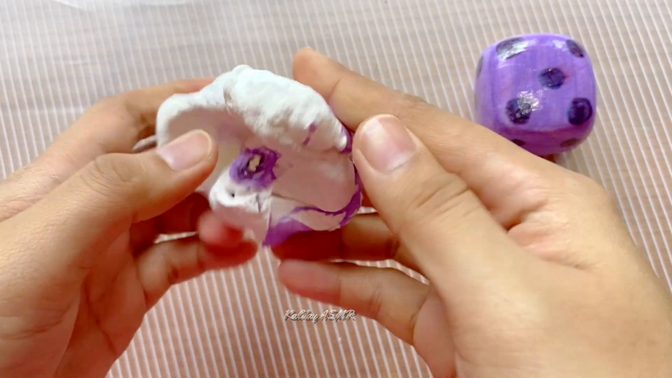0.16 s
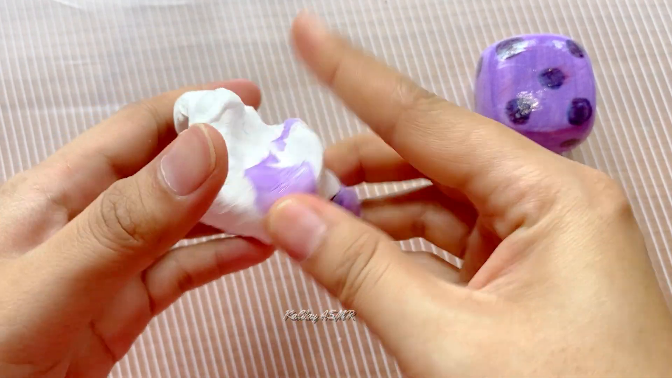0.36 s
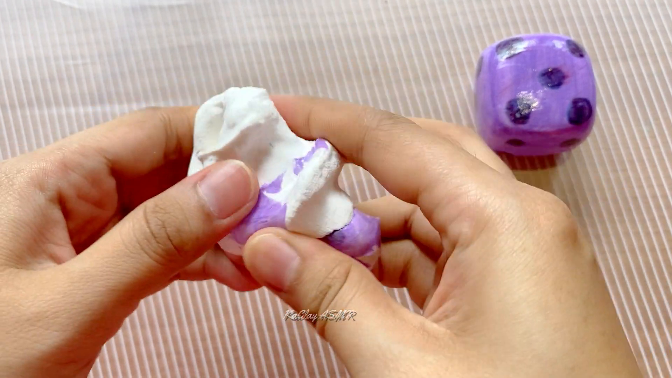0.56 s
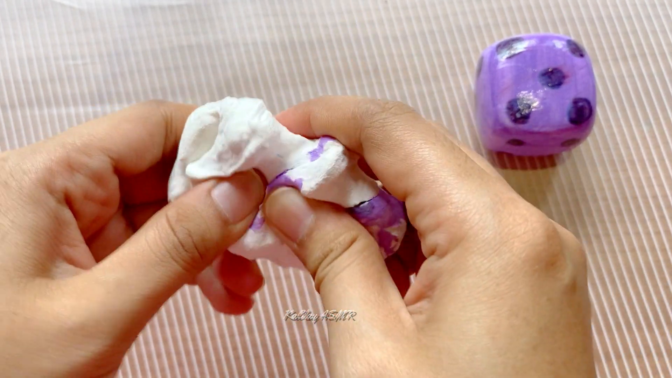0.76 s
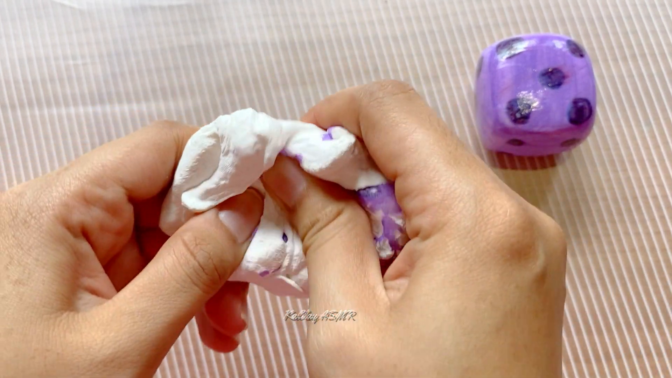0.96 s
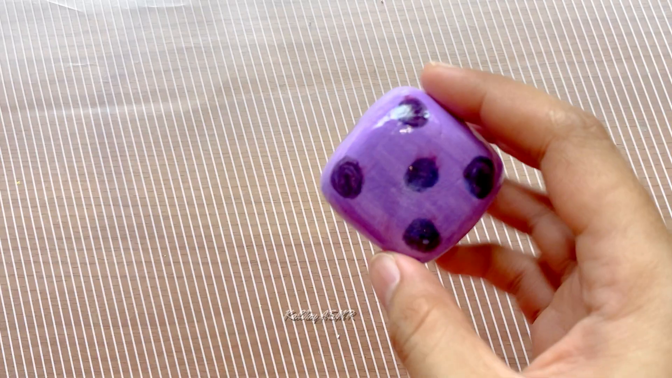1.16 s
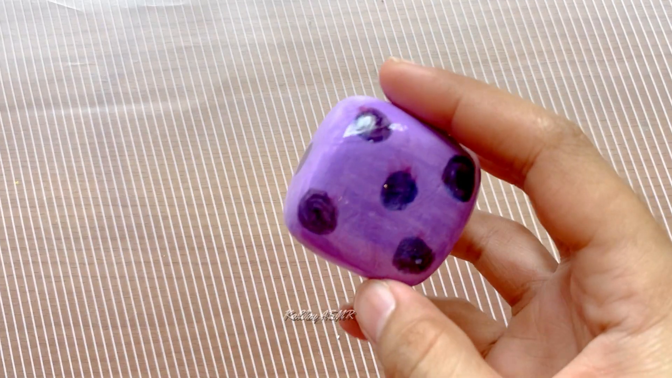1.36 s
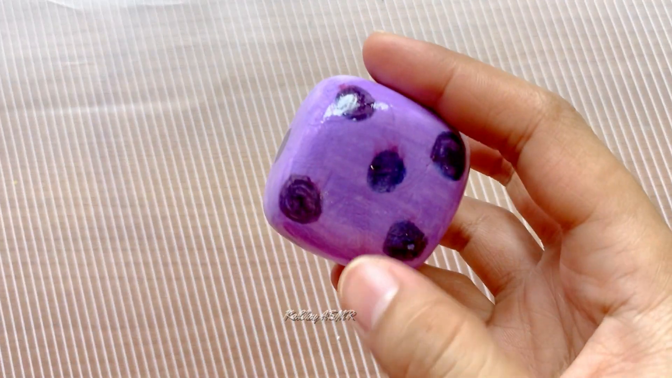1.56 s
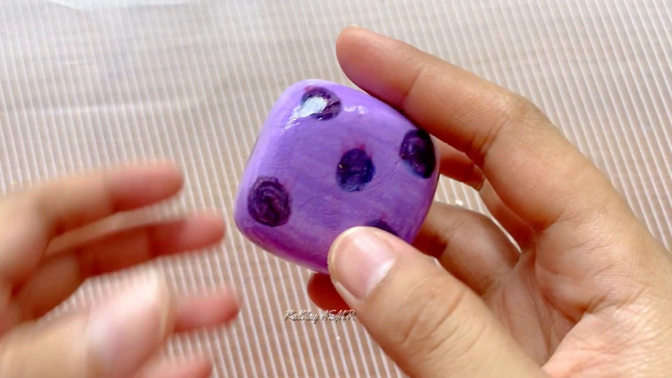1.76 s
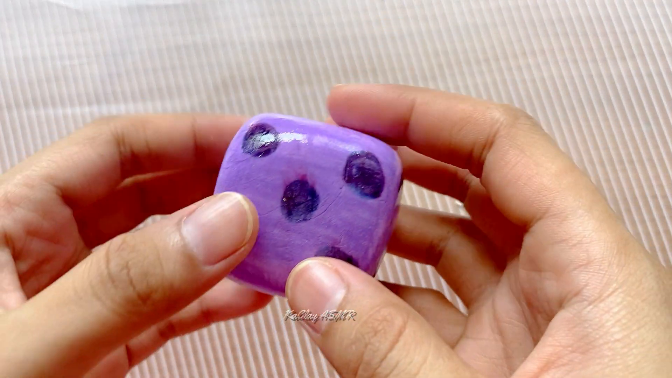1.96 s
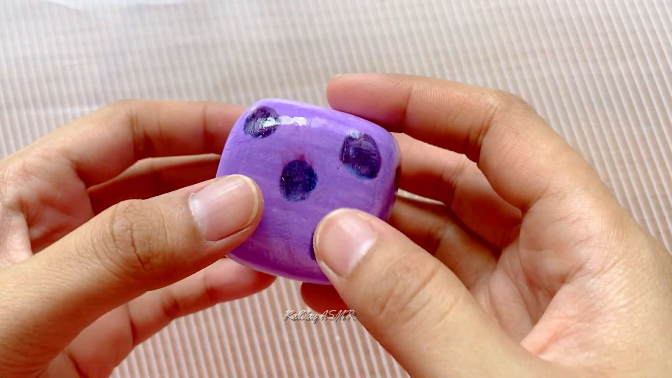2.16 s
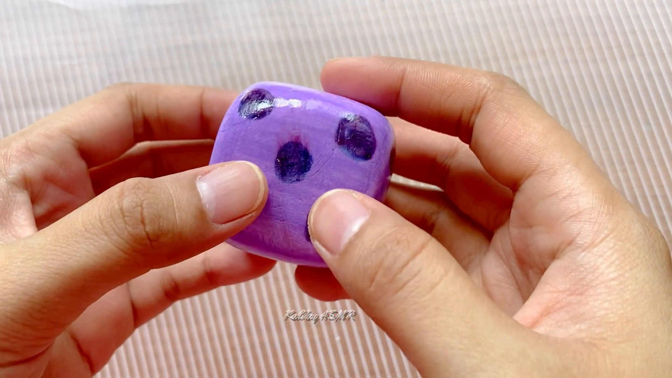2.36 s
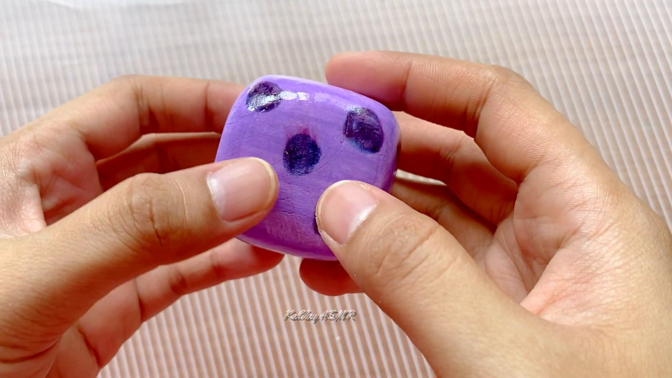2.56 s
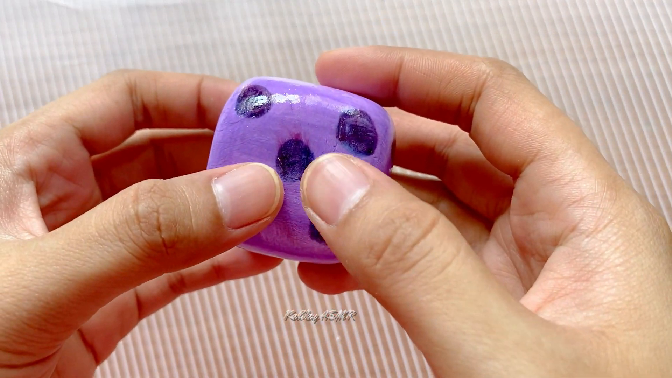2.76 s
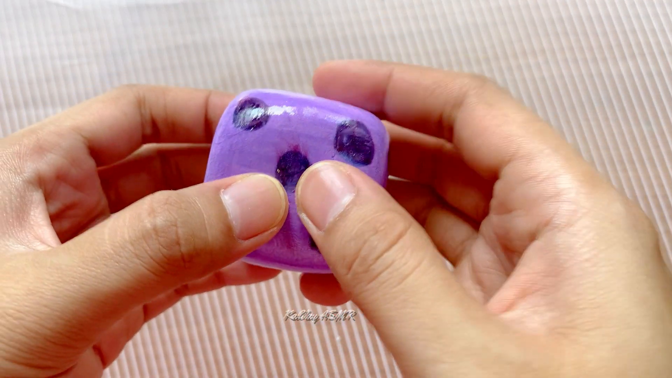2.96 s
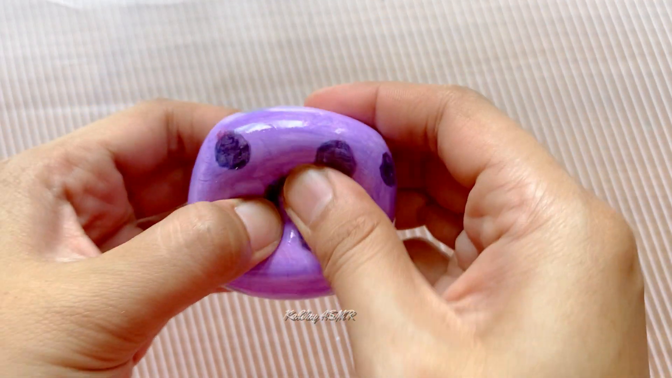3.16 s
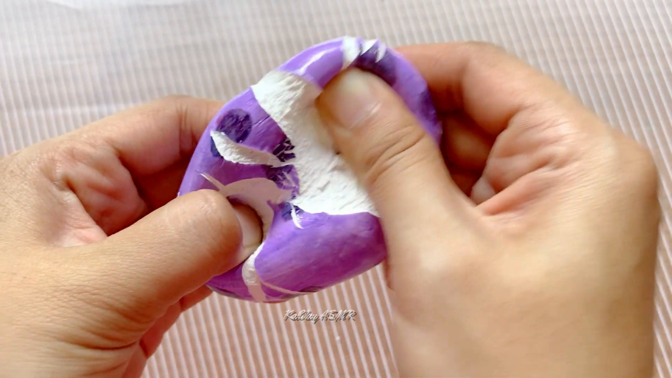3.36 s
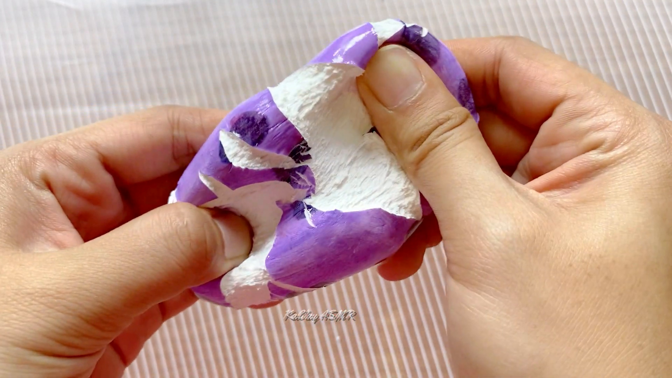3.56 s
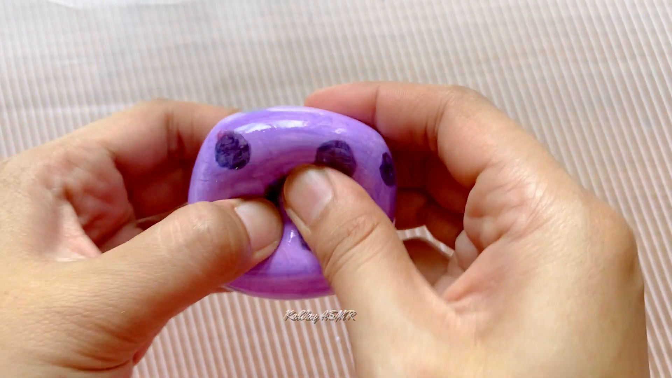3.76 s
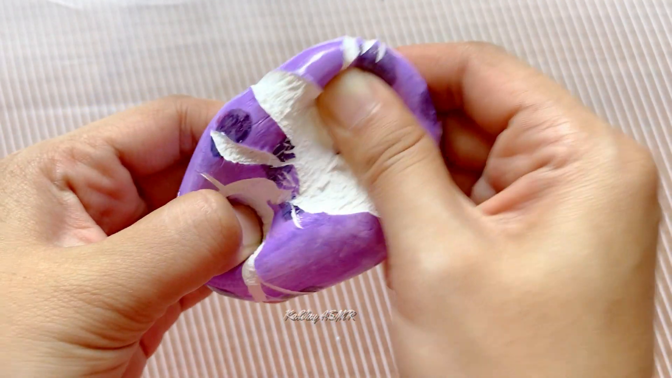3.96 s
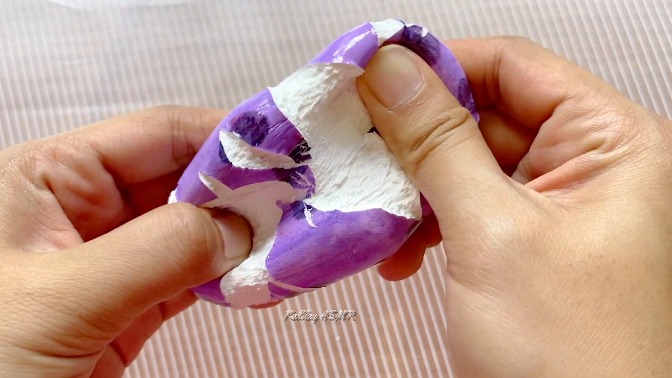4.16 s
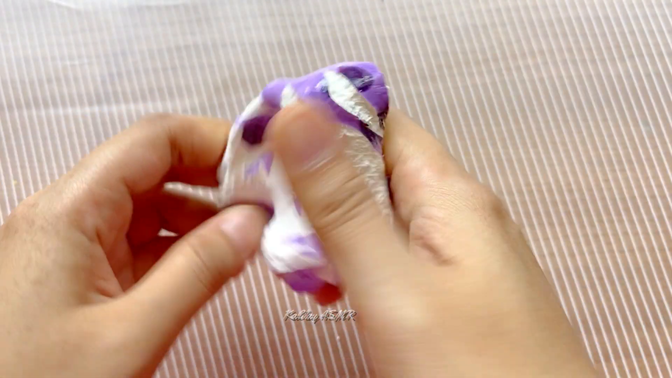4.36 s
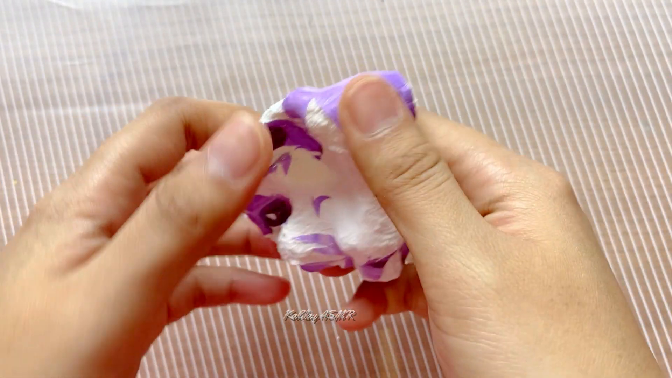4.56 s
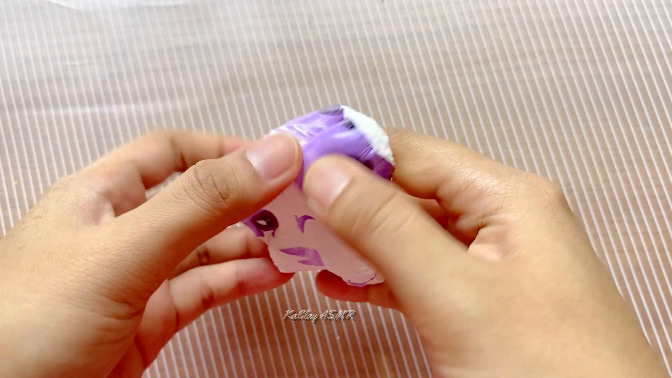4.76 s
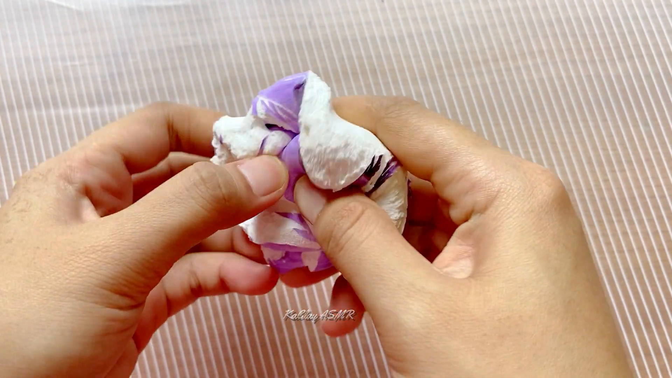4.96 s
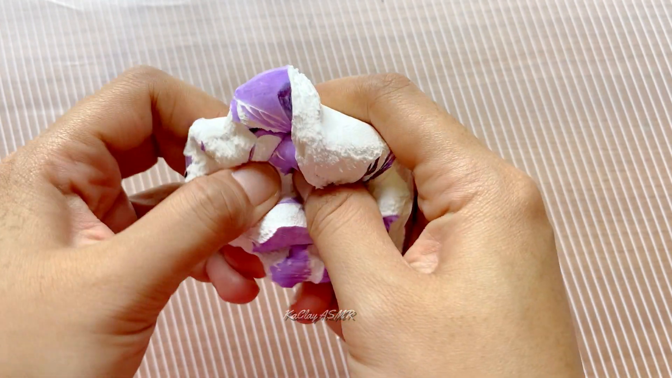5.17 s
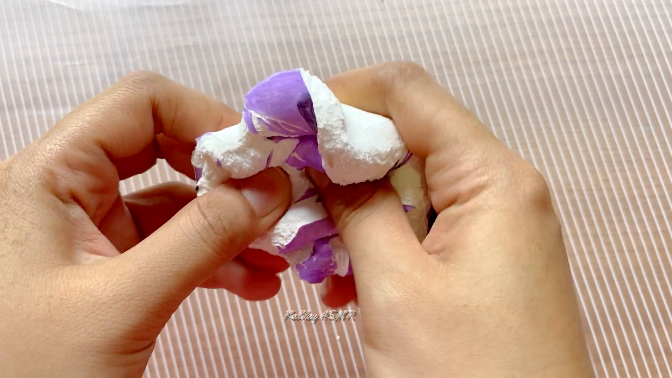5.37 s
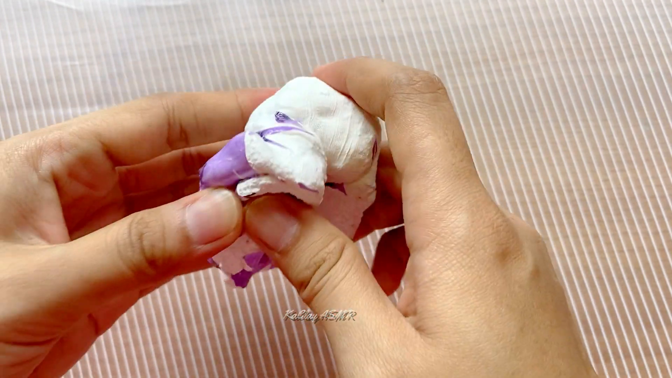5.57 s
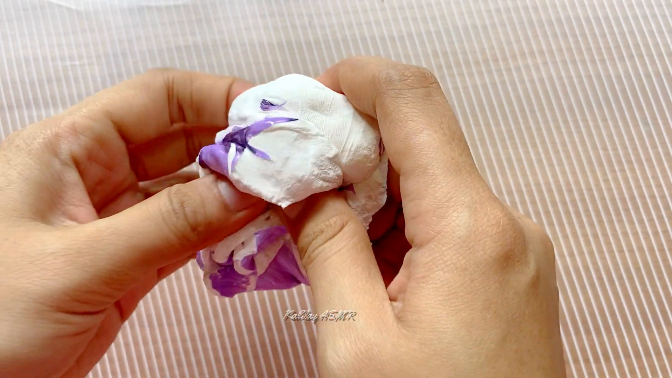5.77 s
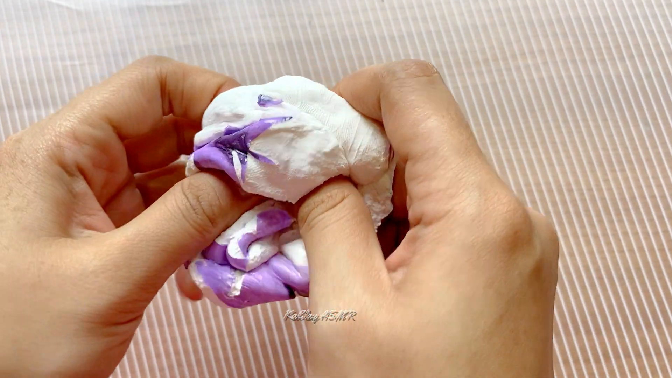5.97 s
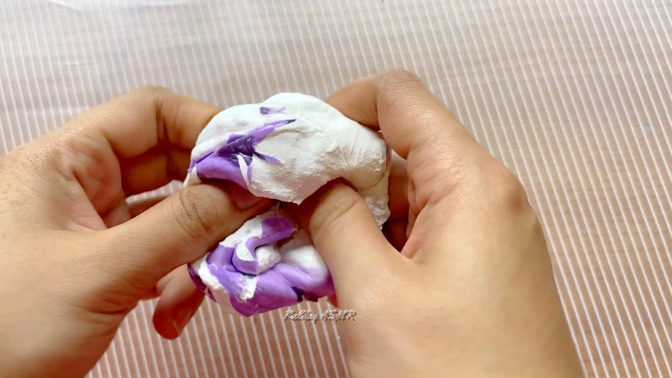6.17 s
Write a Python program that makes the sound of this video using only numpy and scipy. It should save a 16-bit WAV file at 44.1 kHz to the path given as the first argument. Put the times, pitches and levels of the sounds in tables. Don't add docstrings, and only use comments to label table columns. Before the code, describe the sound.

A quiet room with faint hiss and a low distant rumble, the microphone very close. At 0.03-0.25 s a short pinch gives bright brittle snaps over crumbling clay, trailing into tiny sticky ticks until 0.6. From 0.7 kneading crackles densely, then is cut off abruptly at 1.13. Near silence follows, with a barely audible rub or knock and a faint tick at 3.0. From 3.18 a fresh shell breaks, the hardest cracks at 3.26-3.4 overloading sharply, with short low clay thuds and sizzling splinters, fading by 3.5. The same break repeats at about 3.8-4.1. Folding crackles at 4.22-4.55, then a sticky tick at 4.68. Crushing builds from 5.0, dense and crunchy, ending on a loud snap at 5.48 and sudden release. A short stuttering thumb drag at 5.66 leads into wringing, bright snaps and crumbs thinning out by 6.2.

```python
import sys
import numpy as np
from scipy import signal
from scipy.fft import rfft, irfft, next_fast_len
from scipy.io import wavfile

SR = 44100
rng = np.random.default_rng(int(sys.argv[2]) if len(sys.argv) > 2 else 0)


def amplitude_ratio(level_db):
    exponent = np.asarray(level_db, float) / 20
    return 10 ** exponent


def generate_wav(signal):
    frames = np.transpose(np.atleast_2d(signal))
    scaled = np.clip(frames, -1, 1) * 32767
    pcm = np.round(scaled).astype(np.int16)
    wavfile.write(sys.argv[1], SR, pcm)


N = 274302

REPLAY_S, REPLAY_TO_S, REPLAY_LAG = 3.04, 3.62, 26436


def rms_one(x):
    return x / np.sqrt(np.mean(x ** 2) + 1e-20)


def top_one(x):
    return x / np.max(np.abs(x))


def band(x, low_hz, high_hz, order=2):
    edges_hz = [low_hz, min(high_hz, .45 * SR)]
    return signal.sosfilt(signal.butter(order, edges_hz, "band", fs=SR, output="sos"), x)


def resonance(x, hz, width_hz):
    r = np.exp(-np.pi * width_hz / SR)
    gain = (1 - r * r) / 2
    return signal.lfilter([gain, 0, -gain], [1, -2 * r * np.cos(2 * np.pi * hz / SR), r * r], x)


def colour(x, spectrum):
    hz, level_db = np.transpose(spectrum)
    size = next_fast_len(N)
    grid = np.maximum(np.arange(size // 2 + 1) * SR / size, 1)
    gain = amplitude_ratio(np.interp(np.log(grid), np.log(hz), level_db))
    return rms_one(irfft(rfft(x, size) * gain, size)[:N])


def drift(rate_hz):
    lowpass = signal.butter(2, rate_hz, fs=SR, output="sos")
    return rms_one(signal.sosfilt(lowpass, rng.standard_normal(N + SR))[SR:])


def swell(s, rise, fall):
    t = np.arange(N) / SR
    return np.exp(np.where(t < s, -((t - s) / rise) ** 2, (s - t) / fall))


def place(out, s, sound):
    at = round((s - .001) * SR)
    out[at:at + len(sound)] += sound


def room_tone():
    # hz, level_db (per Hz)
    air = [(18, -36), (30, -3.5), (66, -11), (127, -1), (233, -16.5), (287, -8), (1130, -14), (1220, -14.5),
           (2750, -19), (11100, -20.5), (16000, -20.5)]
    # start_s, level_db
    rumble = [(0, -57), (.6, -61.5), (1.201, -53), (1.601, -57.5), (2.199, -63.5), (4.499, -59.5),
              (6.22, -60.5)]
    # pitch_hz, width_hz, level_db
    hums = [(177.8, 1.8, -69.5), (234.2, 7, -71), (338, 8.8, -78), (10686, 30, -81)]
    # start_s, rise_s, fall_s, low_hz, high_hz, level_db
    faint = [
        (1.68, 0.017, 0.098, 920, 1120, -55.5),
        (3.017, .003, .004, 4000, 15800, -50),
        (0.70, 0.04, 0.05, 900, 1150, -60),
        (1.44, .03, 0.03, 6000, 15400, -57.5),
    ]

    out = amplitude_ratio(-62) * colour(rng.standard_normal(N), air)
    s, rumble_db = np.transpose(rumble)
    throb = amplitude_ratio(np.interp(np.arange(N) / SR, s, rumble_db) - 1)
    out += throb * rms_one(band(rng.standard_normal(N), 48, 71.5))
    for hz, width_hz, level_db in hums:
        out += amplitude_ratio(level_db) * rms_one(resonance(rng.standard_normal(N), hz, width_hz))
    for s, rise, fall, low_hz, high_hz, level_db in faint:
        rub = rms_one(band(rng.standard_normal(N), low_hz, high_hz))
        out += amplitude_ratio(level_db) * swell(s, rise, fall) * rub
    return out


def scrape():
    # start_s, rise_s, fall_s, low_hz, high_hz, level_db
    drag = (5.664, .016, .05, 3100, 4400, -36)
    s, rise, fall, low_hz, high_hz, level_db = drag
    stutter = rng.standard_normal(N) * amplitude_ratio(5 * drift(90))
    humps = band(stutter, low_hz, high_hz, order=3)
    humps = humps + band(stutter, low_hz / 2, high_hz / 2, order=3) / 2
    return amplitude_ratio(level_db) * swell(s, rise, fall) * rms_one(humps)


def squeeze():
    # time_s, level_db
    grips = [
        [(0, -57.5), (.06, -41), (.083, -26), (.145, -27), (.226, -47), (.33, -66)],
        [(.70, -72.5), (.734, -44.5), (.788, -42.5), (.84, -47), (.902, -36.5), (.971, -41), (.999, -36.5),
         (1.14, -39)],
        [(3.17, -66), (3.208, -39.5), (3.257, -47), (3.293, -14.5), (3.40, -23.5), (3.524, -42), (3.64, -62)],
        [(4.2, -57), (4.255, -45), (4.38, -25.5), (4.458, -35), (4.487, -39), (4.615, -60), (4.733, -71.5)],
        [(4.74, -75.5), (4.81, -51), (4.952, -62.5), (4.996, -46), (5.12, -53.5)],
        [(5.12, -53.5), (5.15, -28.5), (5.245, -33.5), (5.37, -49.5), (5.405, -40), (5.44, -39), (5.478, -16.5),
         (5.494, -33.5), (5.501, -52.5), (5.52, -67.5)],
        [(5.563, -63), (5.664, -39.5), (5.71, -56.5), (5.746, -46), (5.846, -27), (5.947, -38), (6.04, -27.5),
         (6.127, -40.5), (6.23, -47)],
    ]
    t = np.arange(N) / SR
    return sum(amplitude_ratio(np.interp(t, *np.transpose(rows), -150, -150) - 1.5) for rows in grips)


def crumble():
    # hz, level_db (per Hz)
    crumb = [(120, -40), (500, -28), (800, -10.5), (1140, 0.5), (2250, 0), (3620, -3), (4430, -2),
             (10100, 0.5), (13300, -0.5), (16000, -8.5)]
    noise, clumps, grains = colour(rng.standard_normal(N), crumb), amplitude_ratio(6.4 * drift(55)), 0
    for low_hz, high_hz in [(1300, 4500), (3000, 9000), (7000, 16000)]:
        born = rng.random(N) < 700 * clumps / SR
        sizes = amplitude_ratio(3.8 * np.minimum(rng.exponential(1, N), 4)) * born
        env = signal.lfilter([1], [1, -np.exp(-1 / (.00019 * SR))], sizes)
        grains = grains + band(noise * (rms_one(env) + 1), low_hz, high_hz)
    smooth_lows = band(noise, 150, 1300)
    return rms_one(grains + smooth_lows) * squeeze()


def jerks(peak_db, draw, run_s):
    t = np.arange(draw.shape[1]) / SR - .001
    lead_in = amplitude_ratio(-6.5) * np.exp(np.minimum(t, 0) / .00015)
    run = np.exp(-t / (run_s * amplitude_ratio(.056 * (peak_db + 22))))
    run += amplitude_ratio(-20.5) * np.exp(-t / .002)
    run += 6.5 * np.exp(-t / .00007)
    return draw[0] * amplitude_ratio(4.7 * draw[1]) * np.where(t < 0, lead_in, run)


def ticks(table, sharpness, broad_db, run_s):
    out = np.zeros(N + SR)
    for (s, peak_db, hz), draw in zip(table, rng.standard_normal((len(table), 2, 1024))):
        force = jerks(peak_db, draw, run_s)
        tick = amplitude_ratio(broad_db) * band(force, 1700, 15500, order=3)
        tick += amplitude_ratio(-14) * band(force, .6 * hz, 2.5 * hz)
        tick += resonance(force, min(hz, 15000), hz / sharpness)
        place(out, s, amplitude_ratio(peak_db + 3.5) * top_one(tick))
    return out[:N]


def peeling():
    # start_s, peak_db, ring_hz
    tacks = [(4.6794, -30.5, 3170), (5.5709, -24, 2700), (0.404, -40, 3190), (0.4085, -37.5, 3700),
             (0.427, -35.5, 3380), (0.5605, -37.5, 3370), (0.5785, -34.5, 3370), (3.015, -42, 1675),
             (4.65, -39.5, 3200), (4.6635, -32.5, 3080), (5.5523, -30, 3200), (0.7425, -35, 1120)]
    return ticks(tacks, sharpness=9, broad_db=-24, run_s=.002)


def chips():
    count, crowding = 70, .5
    over_db, spread_db = 10.5, 2.5
    clay_hz, lacquer_hz = 5400, 12800
    draw, gain = rng.standard_normal((count, 3)), squeeze()
    worked = np.abs(np.arange(N) / SR - (REPLAY_S + REPLAY_TO_S) / 2) > 1 / 2
    share = np.cumsum(gain ** crowding * worked)
    at = np.searchsorted(share, share[-1] * (np.arange(count) + rng.random(count)) / count)
    splinter_hz, flake_hz = lacquer_hz * amplitude_ratio(.53 * draw[:, 1]), clay_hz * amplitude_ratio(3.5 * draw[:, 1])
    hz = np.where(draw[:, 0] > 0, splinter_hz, flake_hz)
    peak_db = 20 * np.log10(gain[at]) + over_db + spread_db * draw[:, 2]
    rows = np.transpose([np.maximum(at / SR, .002), peak_db, hz])
    return ticks(rows, sharpness=1.8, broad_db=-13.5, run_s=.0012)


def thuds():
    # start_s, peak_db
    yields = [(3.263, -19), (3.281, -21.5), (3.3117, -24.5), (3.328, -25.5), (3.335, -14.5), (3.3454, -9),
              (3.3816, -22.5), (3.4418, -28), (4.3823, -47), (4.4263, -26), (5.1365, -26), (5.1801, -32),
              (0.144, -42.5), (5.402, -21), (0.7282, -41), (5.4801, -17.5), (5.7524, -39), (5.845, -42),
              (5.9804, -21), (6.029, -22)]
    out = np.zeros(N + SR)
    for (s, peak_db), draw in zip(yields, rng.standard_normal((len(yields), 2, 1024))):
        force = jerks(0, draw, run_s=.00037)
        push = band(force, 140, 1200) + amplitude_ratio(-5) * band(force, 70, 290)
        place(out, s, amplitude_ratio(peak_db) * top_one(push))
    return out[:N]


def snaps():
    # start_s, peak_db, flake_hz, sizzle_db (re flake), splinter_hz
    pinch = [(0.0331, -30, 2740, 3, 11910), (0.0505, -22.5, 2500, 9, 11930),
             (0.0654, -30.5, 2900, -2, 14010), (0.0826, -25.5, 6550, 12, 13930),
             (0.1064, -17, 3413, 0, 12800), (0.1084, -19.5, 3500, 6, 12930),
             (0.1168, -20, 8400, -5.5, 8770), (0.1238, -11.5, 3250, -9.5, 13520),
             (0.1386, -18, 4370, 1.4, 12800), (0.1425, -13.5, 8070, -1.1, 12550),
             (0.1451, -13.5, 4260, 0.5, 9000), (0.148, -5.5, 7240, -1.4, 11920),
             (0.1496, -7.5, 2190, -5, 8970), (0.1527, -16, 5880, -4.5, 12020),
             (0.1637, -9, 6950, -11.5, 8940), (0.192, -13.5, 3040, 0, 14300),
             (0.1937, -16.5, 2940, -12, 12800), (0.2132, -26.5, 3250, -4, 9200),
             (0.2585, -35.5, 1910, -5.5, 13400), (0.3228, -49, 6650, 11.5, 14330),
             (0.3402, -46.5, 6740, 15, 14300), (0.3861, -39.5, 2460, 4, 8900), (0.4239, -27, 5100, 0, 9900),
             (0.4413, -18.5, 5750, 2.5, 9940), (0.5578, -41, 3380, -14, 9500),
             (0.5754, -41.5, 3300, 4, 9370), (0.5782, -43.5, 3290, -4.5, 14220),
             (0.5911, -40, 3230, 4.5, 13080), (0.595, -42.5, 2250, -2.5, 14300)]
    knead = [(0.7107, -22, 3340, -1, 9500), (0.728, -10.5, 3280, -1.5, 9200),
             (0.737, -19.5, 6800, -5.5, 9600), (0.747, -21.5, 7800, 3.5, 9000),
             (0.7556, -29.5, 4160, 7, 11600), (0.7648, -8.5, 8000, -12.5, 8700),
             (0.773, -14, 4100, 9, 12200), (0.78, -17, 7650, 8.5, 13800), (0.7869, -12, 7740, 11, 12500),
             (0.7951, -7, 6160, 0, 12400), (0.799, -12, 8400, -3.5, 8750), (0.8251, -34, 3940, 11, 12400),
             (0.8286, -30, 7710, 9, 14300), (0.8406, -27, 5360, 2, 13490), (0.846, -20, 7600, 5.5, 13040),
             (0.8693, -16.5, 4970, -5, 13040), (0.8716, -26, 4260, 5, 13900),
             (0.882, -20, 4030, 0.8, 12080), (0.887, -8.5, 5170, 0.5, 12430),
             (0.8894, -8.5, 4130, -2.5, 13680), (0.8994, -6, 5080, 0, 12040), (0.9095, -9.5, 2430, 5, 8680),
             (0.9297, -14, 5550, -2.5, 9230), (0.936, -15.5, 6360, 0, 12500), (0.948, -16, 4400, -6, 11430),
             (0.973, -17, 5560, 7, 8800), (0.977, -24.5, 5770, 0.5, 8800), (0.9899, -5.5, 5800, 4.5, 12900),
             (1.0004, -8.5, 4600, 1.5, 13000), (1.0126, -17, 5460, -1.5, 11200),
             (1.03, -6, 5460, -4, 13700), (1.0322, -13.5, 5100, 6, 8800), (1.039, -11, 7100, -6, 13900),
             (1.052, -14.5, 5710, -7, 12900), (1.065, -14.5, 7500, 4.5, 10800),
             (1.0698, -5.5, 5120, -3, 13650), (1.0871, -9, 2990, -9, 12300),
             (1.1037, -11.5, 7800, 0.5, 8500), (1.109, -13, 4130, -8, 11600),
             (1.1268, -4.6, 2800, -2, 11070)]
    shell_break = [(3.1769, -27, 4350, 2, 12650), (3.1864, -21, 5160, -1, 13720),
                   (3.1916, -18, 4870, 3, 12380), (3.1963, -29, 4500, 2.5, 12640),
                   (3.2038, -11, 5510, 0.3, 13290), (3.2082, -22.5, 5200, 10, 9240),
                   (3.2106, -13.5, 8600, 4.5, 9014), (3.2631, 7.5, 4300, 0.5, 11150),
                   (3.2763, -13.5, 5190, -2.5, 13120), (3.2798, 18, 4125, 5, 12850),
                   (3.2902, -9, 8620, 2, 8650), (3.2942, -0.5, 5360, 0, 13240),
                   (3.2992, -15.5, 5500, 7, 13710), (3.3037, -1, 2305, -8, 12800),
                   (3.314, -2.5, 6460, 4.5, 13800), (3.3151, -2, 2395, -3.5, 14300),
                   (3.3197, -7, 2694, 3, 12690), (3.3198, 2.5, 2202, -10.5, 13600),
                   (3.3274, 0, 1892, 3.3, 8800), (3.336, 7.5, 6920, 1, 12290),
                   (3.3433, -14.5, 5090, 1, 12620), (3.3433, 11.5, 4685, 4.3, 9050),
                   (3.3593, 3.5, 2244, -3, 12800), (3.3668, 1, 3137, 2, 13120),
                   (3.3736, -8, 2259, 0.5, 12800), (3.3845, 3, 4200, 5.5, 13680),
                   (3.394, -25, 6310, -3.5, 9270), (3.4043, -17.5, 1985, 0, 12020),
                   (3.4233, -15, 3180, -7.5, 12900), (3.4408, -2.5, 2690, 3.5, 12900),
                   (3.469, -37.5, 2780, 1.5, 12270), (3.4865, -8.5, 8130, -3.5, 12320),
                   (3.4962, -31.5, 5060, 5, 12070), (3.5137, -13.5, 6940, 6, 12120),
                   (3.573, -44.5, 4090, -3, 11280), (3.6082, -44, 2000, 5.5, 12200)]
    fold = [(4.221, -38.5, 2840, 10, 11870), (4.2245, -36.5, 7970, 13, 11930),
            (4.2479, -31.5, 6330, 3, 10140), (4.2614, -38.5, 8300, 15, 12090),
            (4.2628, -28.5, 6200, 9.5, 14250), (4.2656, -17, 6420, 3, 14480), (4.2762, -25, 8420, 8, 8700),
            (4.2811, -19.5, 4460, 11.5, 13500), (4.2872, -25, 2810, -4, 13610),
            (4.2961, -27.5, 4500, 3, 13360), (4.3125, -20, 6340, -2.5, 9210),
            (4.3267, -30.5, 3310, 10.5, 14920), (4.3298, -15, 7230, -9, 13170),
            (4.3353, -15, 6350, -1.5, 12570), (4.3852, -10, 4680, 6, 12170), (4.3827, 0.5, 3064, 5, 12510),
            (4.3648, -21, 7650, 12, 11990), (4.3701, -19.5, 1970, 9, 13590), (4.379, -3, 4200, 8.5, 13070),
            (4.3875, -9, 2808, 9, 12520), (4.4061, -20, 3846, -2, 14260), (4.4231, -1, 3040, -0.5, 14380),
            (4.4307, -20.5, 3040, 3, 11940), (4.4529, -26, 7920, 5.5, 14040),
            (4.4613, -26.5, 8420, -0.2, 8910), (4.4786, -11, 7780, -1.1, 13120),
            (4.4899, -16.5, 5700, 7, 11610), (4.4902, -23, 8290, 2.5, 14260),
            (4.5334, -27.5, 2600, 0.5, 8900), (4.551, -13, 2760, 5.2, 8800)]
    crush = [(4.9732, -46, 7080, 17, 11830), (4.9906, -41.5, 8480, 22, 12000),
             (5.0075, -33, 8600, 8.5, 11740), (5.0114, -31.5, 5350, 12, 13710),
             (5.0211, -38, 8200, 9.5, 11650), (5.0288, -18, 5300, 13.5, 13600),
             (5.0551, -19, 4030, -5, 11390), (5.0623, -27.5, 7170, 9, 11720),
             (5.0782, -15.5, 2670, -3.5, 12530), (5.0879, -21.5, 2330, -12.5, 11500),
             (5.0953, -24.5, 5200, -3.5, 12400), (5.1127, -12.5, 3120, -4, 12260),
             (5.1208, -13.5, 8420, 4.5, 13410), (5.1382, -5.5, 1970, 3.5, 13050),
             (5.1453, -18.5, 2130, -7, 12910), (5.1481, -18.5, 2790, -4, 13260),
             (5.1577, -3, 6173, 2.6, 12300), (5.1627, -4.5, 2266, -8.5, 13900),
             (5.1732, -20.5, 5640, 4.5, 9600), (5.1825, -4, 8400, 6, 8800),
             (5.1875, -2.5, 3002, -5.5, 8880), (5.2098, -10.5, 2652, -8, 12790),
             (5.2204, -18, 4334, 9.5, 11780), (5.2378, -4, 5270, 6, 11280), (5.2459, -26, 6420, 9.5, 14280),
             (5.2673, -34.5, 8480, 15.5, 9930), (5.2735, -19.5, 7780, -1.5, 10100),
             (5.2909, -5.5, 7400, 2, 9000), (5.3174, -28, 7670, -2.5, 9170),
             (5.3348, -13.5, 7870, -6.5, 8400), (5.3629, -25, 7510, -5, 8800),
             (5.3803, -14, 7760, 1.5, 8560), (5.3827, -20, 7546, 10, 12800),
             (5.4001, -4.5, 6290, 8.5, 12450), (5.4145, -22, 8430, 1.2, 13230),
             (5.4591, -20, 5350, 6.5, 14030), (5.462, -6, 3980, -3, 12940), (5.4762, 0, 5100, -1, 13370),
             (5.4792, 13.5, 4074, 1, 13170), (5.5067, -32.5, 8630, 11, 12140)]
    wring = [(5.6995, -29, 3600, 0, 8800), (5.7038, -30.5, 3670, 7.5, 12000),
             (5.7212, -14.5, 3650, 3, 11380), (5.7353, -10.5, 3720, 4.5, 13400),
             (5.7527, -10, 6985, 13, 13520), (5.7685, -7.5, 3460, 2, 11770),
             (5.7842, -14.5, 3330, 2.6, 9510), (5.7931, -11.5, 3750, -1.5, 8900),
             (5.8085, -5, 8090, 2, 13350), (5.8141, -25, 2300, 11.5, 9950), (5.826, -7.5, 3034, 1, 14000),
             (5.843, 2.5, 3075, -2.5, 14130), (5.8522, -8, 5230, -4.5, 8780), (5.8678, -11, 3156, 0, 10390),
             (5.8768, -21.5, 3650, 0, 12200), (5.885, -21, 4760, -6, 12360),
             (5.9031, -4.5, 3920, -4, 12420), (5.9087, -22.5, 8470, 10, 12620),
             (5.9261, -12, 5830, 17.5, 14490), (5.9298, -9, 7910, 4.5, 12530),
             (5.9546, -10.5, 4276, -3, 8830), (5.96, -19, 2690, -6.5, 14170),
             (5.967, -12.5, 7830, -6, 11540), (5.9794, -12, 7880, -5.5, 14380),
             (5.9808, -13, 5210, 2.5, 8830), (5.9843, -2.5, 5370, -1, 11220),
             (5.9898, -7, 2617, -2.5, 11820), (5.9987, -1, 3000, -5, 9830), (6.0131, -5, 2568, -7, 11600),
             (6.017, -17, 2700, -1.6, 12430), (6.0308, 4.5, 2526, -5, 11530),
             (6.047, -4.5, 4283, -8.5, 9340), (6.0704, -12.5, 8350, -6.5, 8730),
             (6.0846, -4, 3050, -17, 8950), (6.138, -38, 8480, 26, 11320), (6.1573, -15.5, 4950, -5, 9390),
             (6.1753, -32.5, 6310, -7.5, 8800), (6.1961, -24, 6050, -2.5, 8880),
             (6.2136, -9.5, 6330, -1, 8910), (6.2151, -21.5, 6013, -2, 11540)]
    table = [*pinch, *knead, *shell_break, *fold, *crush, *wring]

    out = np.zeros(N + SR)
    for row, draw in zip(table, rng.standard_normal((len(table), 2, 1024))):
        s, peak_db, hz, sizzle_db, splinter_hz = row
        force = jerks(peak_db + max(sizzle_db, 0), draw, run_s=.00087)
        shell = band(force, 1900, 3200, order=3) / 2 + band(force, 3900, 8300, order=3)
        flake = band(force, .78 * hz, 1.297 * hz) + resonance(force, hz, .046 * hz)
        piece = amplitude_ratio(-7 + 4 * draw[1, 0]) * resonance(force, 2290, 300)
        body = amplitude_ratio(-3.5) * shell + flake + piece
        sizzle = band(force, 8500, 13960, order=3) + amplitude_ratio(12.5) * resonance(force, splinter_hz, 1300)
        crack = top_one(body) + top_one(sizzle) * amplitude_ratio(sizzle_db)
        push_db = -17.5 + 1.1 * min(peak_db, -8)
        crack += top_one(band(force, 850, 1600)) * amplitude_ratio(push_db)
        place(out, s, amplitude_ratio(peak_db) * crack)
    return out[:N]


def room(x, near_db, far_db):
    t = np.arange(round(.15 * SR)) / SR
    decay = amplitude_ratio(near_db) * np.exp(-t / .003) + amplitude_ratio(far_db) * np.exp(-t / .016)
    echoes = rng.standard_normal(len(t)) * decay * (t > .0012)
    return x + signal.fftconvolve(x, echoes)[:N]


def overload(x):
    clipped = np.clip(x, -.98, .98)
    lowpass = signal.butter(2, 200, fs=SR, output="sos")
    return clipped - signal.sosfiltfilt(lowpass, clipped - x)


def hush(x):
    # start_s, length_s, low_hz, high_hz
    gaps = [
        (3.2405, .019, 700, 4700),
        (5.1265, .008, 500, 16500),
        (5.0165, .003, 3500, 16500),
        (5.101, .007, 3800, 9000),
        (5.501, .014, 900, 1900),
        (5.386, .005, 500, 16500),
        (.4335, .005, 4000, 14000),
    ]
    first_s, *first_rest = gaps[0]
    again = (first_s + REPLAY_LAG / SR, *first_rest)
    t, out = np.arange(N) / SR, x.copy()
    hz = np.arange(N // 2 + 1) * SR / N
    for s, length, low_hz, high_hz in [*gaps, again]:
        inside = np.minimum(t - s, s + length - t) / .001
        gate = np.clip(inside, 0, 1)
        nearby = x * np.clip(inside + 1, 0, 1)
        out -= gate * irfft(rfft(nearby) * ((hz > low_hz) & (hz < high_hz)), N)
    return out


def scene():
    cut, let_go = round(1.1315 * SR), round(5.4975 * SR)
    clay = snaps() + thuds() + chips() + crumble() + peeling() + scrape()
    clay = room(clay, near_db=-33.5, far_db=-49)
    clay[cut:cut + SR // 5] *= np.exp(-np.arange(SR // 5) / (.001 * SR))
    clay[let_go:let_go + 340] *= amplitude_ratio(-20)
    x = clay + room_tone()
    start, stop = round(REPLAY_S * SR), round(REPLAY_TO_S * SR)
    x[start + REPLAY_LAG:stop + REPLAY_LAG] = x[start:stop]
    return x[None]


def roll_off(x):
    return signal.sosfilt(signal.butter(12, 16160, fs=SR, output="sos"), x)


def record(dry):
    return roll_off(hush(overload(dry)))


dry = scene()
out = record(dry)
generate_wav(out)
```